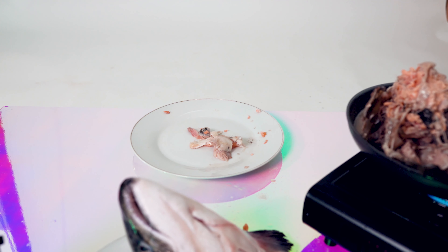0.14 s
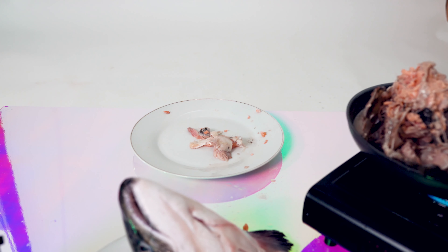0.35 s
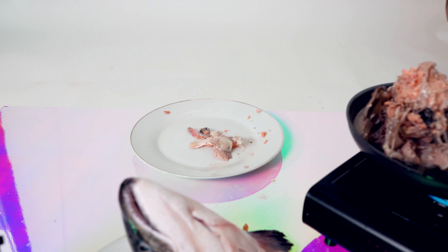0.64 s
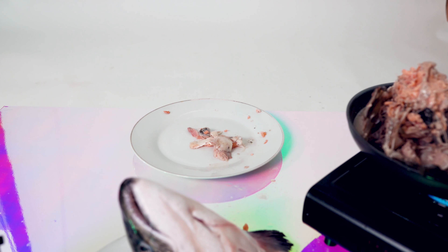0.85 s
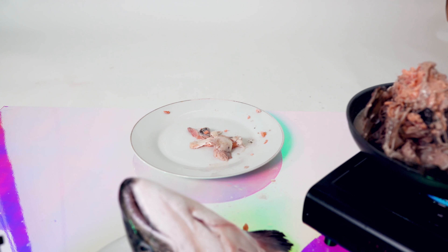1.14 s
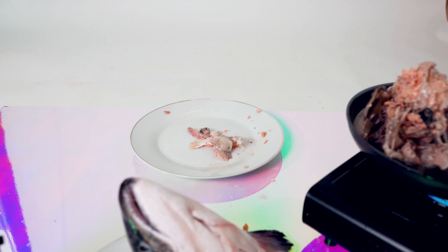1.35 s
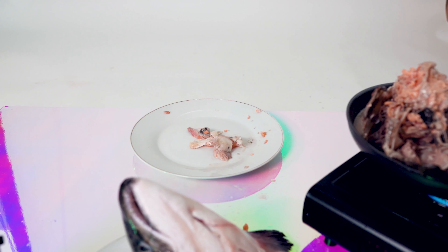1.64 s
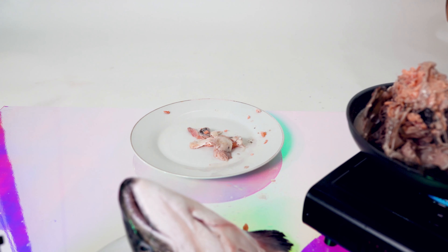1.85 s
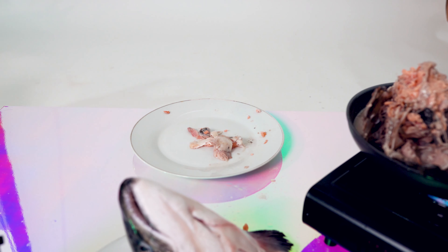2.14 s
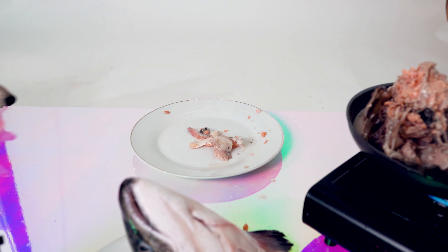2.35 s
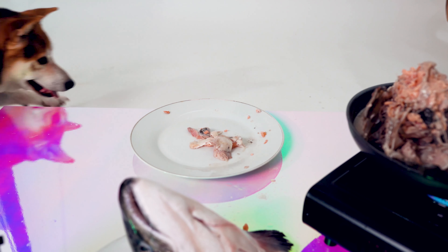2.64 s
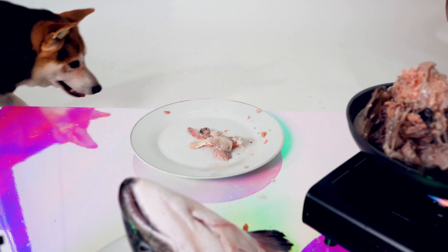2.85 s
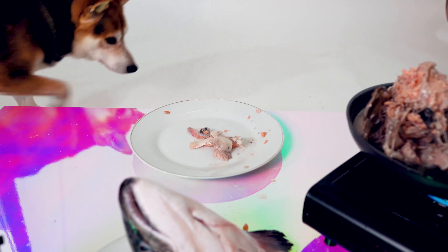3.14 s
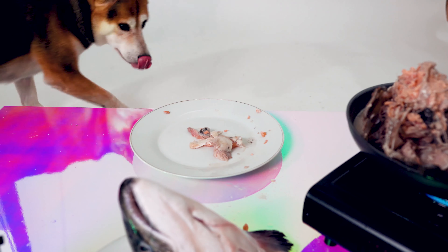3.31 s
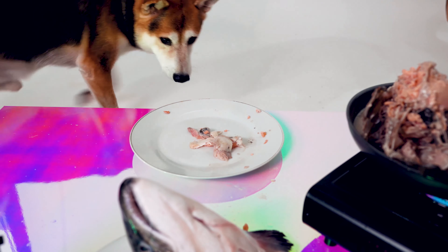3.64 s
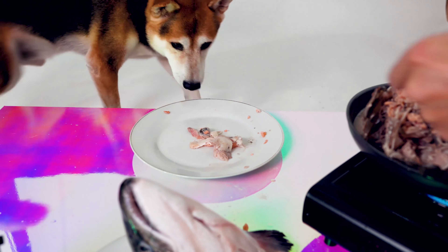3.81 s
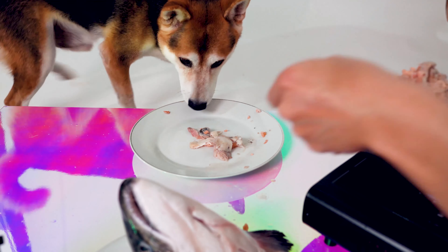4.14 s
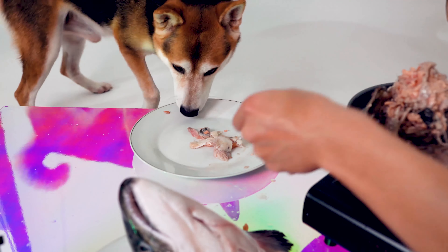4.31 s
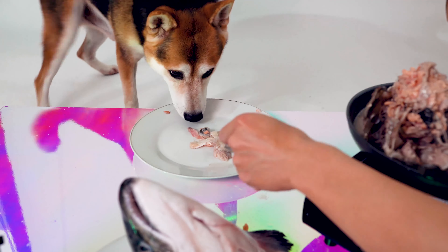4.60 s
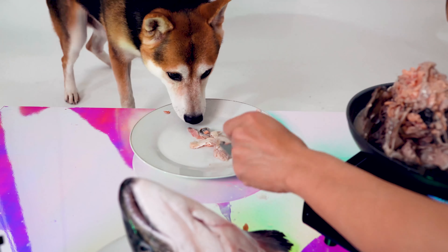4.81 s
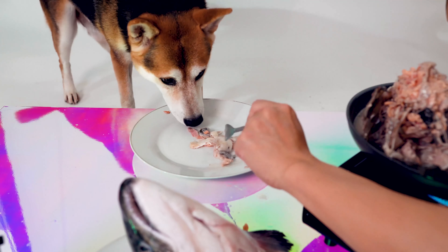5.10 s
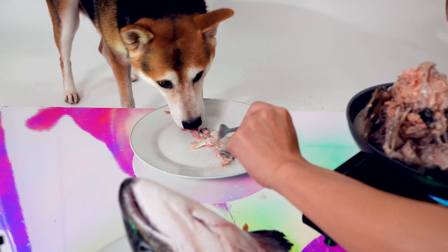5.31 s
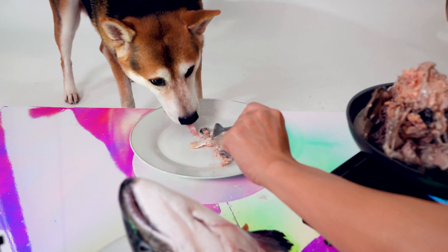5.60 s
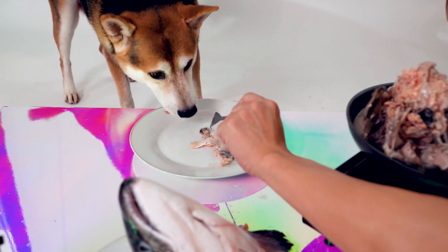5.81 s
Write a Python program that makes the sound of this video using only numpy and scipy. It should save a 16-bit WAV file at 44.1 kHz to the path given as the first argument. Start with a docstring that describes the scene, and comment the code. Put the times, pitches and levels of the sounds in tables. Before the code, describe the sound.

Metal tongs click over a humming fan, then a dog pads up and sniffs while wet food softly squelches on a plate.

```python
"""Fish scraps for the dog

A small bare room with a hard floor and a short echo, heard from one microphone on the table.
A fan hums throughout. Close by, metal tongs click at a bowl of fish and the table is bumped.
A dog pads up over the floor, claws ticking; fur and a sleeve rustle, and the dog sniffs
at a plate while wet scraps squelch on it."""
import sys
import numpy as np
from scipy import signal
from scipy.fft import rfft, irfft, next_fast_len
from scipy.io import wavfile
from scipy.ndimage import uniform_filter1d

SR = 44100
rng = np.random.default_rng(int(sys.argv[2]) if len(sys.argv) > 2 else 0)


def dump(signal):
    """Clip the signal to [-1, 1] and save it as 16-bit WAV at the path in sys.argv[1]."""
    limited = np.clip(np.atleast_2d(signal).T, -1, 1)
    pcm = np.round(limited * 32767).astype(np.int16)
    wavfile.write(sys.argv[1], SR, pcm)


N = 262836
T = np.arange(N) / SR
HIT_T = T[:SR // 3]  # time within one short sound


def undb(db):
    """Decibels to gain."""
    return 10 ** (np.asarray(db) / 20)


def unit(x):
    """Scale to rms 1."""
    return x / np.sqrt(np.mean(x ** 2))


def along(points, hz):
    """Read (f/Hz, value) points on a log-frequency axis."""
    f, value = np.transpose(points)
    return np.interp(np.log(hz + 1), np.log(f), value)


def colour(x, points, peaks=()):
    """Causal filter of unit power gain from a spectrum and (f/Hz, width/Hz, gain/dB) resonances."""
    size = 2 * next_fast_len(len(x))
    hz = np.arange(size // 2 + 1) * SR / size
    peaks_db = sum(db / (1 + (2 * (hz - f) / width) ** 2) for f, width, db in peaks)
    gain = unit(undb(along(points, hz) + peaks_db))
    cepstrum = irfft(np.log(gain))
    cepstrum[1:size // 2] *= 2  # fold to minimum phase
    cepstrum[size // 2 + 1:] = 0
    return irfft(rfft(x, size) * np.exp(rfft(cepstrum)))[:len(x)]


def wander(rate_hz):
    """Smooth random drift of rms 1."""
    hold = int(SR / rate_hz)
    stairs = np.repeat(rng.standard_normal(N // hold + 1), hold)
    return unit(uniform_filter1d(uniform_filter1d(stairs, hold), hold)[:N])


def add(track, s, sound):
    """Mix a sound into a track at time s."""
    start = int(s * SR)
    track[start:start + len(sound)] += sound[:N - start]


# The fan's air as it reaches the table: f/Hz, relative level/dB
AIR_SPECTRUM = [(20, -2.5), (50, -10), (70, 4), (100, 2.5), (160, -2.5), (280, -6), (550, -9),
                (1100, -16.5), (1500, -18.5), (2600, -23), (3700, -28), (6800, -33.5), (11000, -33.5),
                (15500, -41.5)]
# Whistling bands of the fan housing: f/Hz, width/Hz, gain/dB
HOUSING_BANDS = [(1123, 62, 6.5), (3170, 206, 9.5), (3770, 390, 7.5), (5327, 153, 13), (5770, 380, 11.5),
                 (8520, 1500, 5.5), (9660, 350, 3.5), (10960, 450, 6), (12000, 420, 10.5), (14800, 500, 11)]
# Slow shift of the air's treble: t/s, gain/dB
AIR_TREBLE = [(0, 0.5), (3, 1), (5.2, 0.4), (5.96, -2)]
# Motor tones: f/Hz, rms level/dB
MOTOR_TONES = [(118.4, -42.5), (177.6, -52), (376.8, -55), (570.6, -57), (629.8, -63)]
def fan(air_db=-38.5, waver_db=2, waver_hz=2.81):
    """The room tone: steady air through a resonant housing, over a wavering motor hum."""
    air = colour(rng.standard_normal(N), AIR_SPECTRUM, HOUSING_BANDS) * undb(air_db + 0.23 * wander(4))
    treble = signal.sosfiltfilt(signal.butter(2, 5000, "high", fs=SR, output="sos"), air)
    treble_gain = undb(np.interp(T, *np.transpose(AIR_TREBLE)))
    hum = 0
    for hz, db in MOTOR_TONES:
        amplitude = np.sqrt(2) * undb(db + waver_db * wander(9))
        phase = 2 * np.pi * np.cumsum(hz + waver_hz * wander(14)) / SR
        hum += amplitude * np.sin(phase)
    return air + (treble_gain - 1) * treble + hum


def contact(decay, snap):
    """One sharp impact with a share `snap` of the energy, then micro-impacts that die away."""
    burst = np.sqrt(1 - snap) * rng.choice([-1., 1.], len(HIT_T)) * np.exp(-HIT_T / decay)
    burst[0] = np.sqrt(snap * decay * SR / 2)
    return burst


def ringing(modes, scatter_db, max_t60):
    """Free decay of modes; every blow excites them a little differently."""
    out = 0
    for hz, db, t60 in modes:
        gain = undb(db + scatter_db * rng.standard_normal())
        tone = np.sin(2 * np.pi * hz * HIT_T + rng.uniform(0, 2 * np.pi))
        out += gain * tone * np.exp(-np.log(1000) * HIT_T / min(t60, max_t60))
    return out


# The crack of steel on steel: f/Hz, relative level/dB
CRACK_SPECTRUM = [(300, -28), (1650, -21.5), (2100, -8), (3500, -8.5), (5000, -15), (7000, -2.5),
                  (10000, -1), (12500, -1.5), (15500, -11.5)]
# Quickly damped resonances of the arms: f/Hz, width/Hz, gain/dB
ARM_BANDS = [(2290, 230, 3.5), (3200, 220, 5), (4270, 180, 15.5), (5560, 250, 15.5), (6900, 370, 4),
             (8000, 85, 9), (9600, 1000, 5.5), (11520, 480, 7), (13200, 500, 7), (15120, 600, 16.5)]
# Ringing modes of the steel: f/Hz, relative level/dB, t60/s before the cap
STEEL_MODES = [(4050, -10, 0.08), (4980, 0, 0.093), (5350, 0.5, 0.043), (6550, -3, 0.14), (8250, 3.5, 0.13),
               (9157, -23, 0.52), (9717, 3.5, 0.097), (9800, -14, 0.13), (10940, -26, 0.092),
               (11130, -5, 0.14), (12800, -6, 0.094), (13470, -17, 0.19)]
# Clicks at the bowl: t/s, level/dB, ping f/Hz, ping/dB, low clack/dB, first rebound's loss/dB
TONG_CLICKS = [(0.2428, -5.5, 9860, 0, -5.5, 2), (0.3135, -22.5, 15000, -9, 5, 6),
               (0.7718, -17, 7500, -2, 10.5, 8), (1.3444, -25.5, 9570, -3.5, 11, 14),
               (2.2218, -27.5, 11100, -17, -8, 17), (2.4655, -22.5, 8700, -14, 12, 17)]
def tongs(rebound_s=0.0103, contact_s=0.0015, softening=1.63, arm_split=0.025, ring_db=-28):
    """Near the microphone the arms crack shut and rebound, ping slightly apart and ring on faintly."""
    out = np.zeros(N)
    for s, db, hz, ping_db, clack_db, loss_db in TONG_CLICKS:
        phase = 2 * np.pi * hz * HIT_T
        arms = np.sin((1 + arm_split) * phase) - np.sin((1 - arm_split) * phase)
        bands = ARM_BANDS + [(14000, 3100, -1), (2780, 770, clack_db)]
        for k in range(4):  # the strike, then three ever weaker, softer rebounds
            decay = contact_s * softening ** k
            crack = colour(contact(decay, snap=0.046), CRACK_SPECTRUM, bands)
            ping = undb(-11 if k else ping_db) * arms * np.exp(-HIT_T / decay)
            ring = undb(ring_db) * ringing(STEEL_MODES, scatter_db=2, max_t60=0.15)
            add(out, s + k * rebound_s, undb(db - loss_db * k ** 2) * (crack + ping + ring))
    return room(out, wet_db=-7.5)


# Echo of the bare room: f/Hz, t60/s
ROOM_DECAY = [(100, 0.23), (500, 0.49), (2000, 0.41), (6000, 0.45), (10000, 0.19), (16000, 0.5)]
def room(x, wet_db, gap_s=0.0063):
    """Direct sound at the microphone, then a diffuse echo whose bands die at their own pace."""
    t = T[:int(0.6 * SR)]
    edges = np.geomspace(60, 17000, 10)
    tail = 0
    for lo, hi in zip(edges, edges[1:]):
        bandpass = signal.butter(3, [lo, hi], "band", fs=SR, output="sos")
        band = signal.sosfilt(bandpass, rng.standard_normal(len(t)))
        tail += band * np.exp(-np.log(1000) * t / along(ROOM_DECAY, np.sqrt(lo * hi)))
    tail *= (t > gap_s) * (1 + 0.8 * np.exp(-t / 0.016))  # the table and near wall answer first
    return x + undb(wet_db) * signal.fftconvolve(x, tail / np.sqrt(np.sum(tail ** 2)))[:N]


# Dull bumps against the table: t/s, peak level/dB, f/Hz
TABLE_BUMPS = [(.365, -34.5, 62.6), (0.818, -30, 152), (1.349, -22, 78), (4.103, -29, 70.6),
               (4.122, -32, 115), (4.205, -30, 71.6)]
def table_thuds(rise_cycles=1.2, step_db=-17, step_hz=60):
    """Right under the microphone, the table top swings for a few cycles after a bump or a paw step."""
    out = np.zeros(N)
    shakes = [(s, db + step_db, step_hz) for s, db, *_ in PAW_STEPS]
    for s, db, hz in TABLE_BUMPS + shakes:
        rise = rise_cycles / hz
        swing = HIT_T / rise * np.exp(1 - HIT_T / rise)
        add(out, s, undb(db) * swing * np.sin(2 * np.pi * hz * HIT_T))
    return out


# Hard surfaces and grit in contact: f/Hz, relative level/dB
GRIT_SPECTRUM = [(400, -15), (2000, 5), (4000, 2), (6000, -1), (9000, -0.5), (12000, -5), (15500, -11)]
def tick(hz, resonance_db, decay):
    """A hard little contact with one broad resonance."""
    return colour(contact(decay, snap=0.08), GRIT_SPECTRUM, [(hz, 0.34 * hz, resonance_db)])


# Ticks around the table: t/s, level/dB, f/Hz, resonance/dB, decay/s, number of contacts
HARD_TICKS = [(1.3468, -35.5, 1900, 13, 0.0098, 1), (2.8222, -18, 4400, 13, .0026, 3),
              (2.8284, -26, 8500, 10, .003, 1), (3.3233, -28.5, 7360, 14, 0.0033, 1),
              (3.471, -31.5, 2270, 20, 0.0025, 1), (3.515, -38, 2400, 10, .005, 1),
              (4.0077, -18.5, 3420, 12.5, 0.0018, 3), (4.080, -33, 3200, 13, .006, 1),
              (5.165, -35, 9000, 11, .0023, 1), (5.3987, -39, 8400, 14, .0035, 1),
              (5.498, -37, 12800, 21, .0023, 1), (5.7915, -30.5, 3500, 9, 0.0024, 1)]
def ticks(gap_s=0.016, loss_db=6):
    """Claws, bones and crockery tap once or in a short fading rattle."""
    out = np.zeros(N)
    for s, db, hz, resonance_db, decay, count in HARD_TICKS:
        for k in range(round(count)):
            add(out, s + k * gap_s, undb(db - k * loss_db) * tick(hz, resonance_db, decay))
    return room(out, wet_db=-7)


def scuff(rise, fall, spread_db, grain_samples):
    """Friction noise in tiny uneven grains, under a force that builds evenly and dies away."""
    n = len(HIT_T)
    force = np.minimum(HIT_T / rise, 1) * np.exp(-np.maximum(HIT_T - rise, 0) / fall)
    sizes = undb(spread_db * rng.standard_normal(n // grain_samples + 1))
    return force * unit(np.repeat(sizes, grain_samples)[:n] * rng.standard_normal(n))


# The slap of a pad: f/Hz, relative level/dB
PAD_SPECTRUM = [(40, -11), (110, -5), (200, 0), (290, 0.5), (600, -5), (1100, -10), (2000, -17.5),
                (3800, -17), (6000, -38.5), (15000, -29)]
# Modes of the floor covering: f/Hz, relative level/dB, t60/s before the cap
FLOOR_RING = [(231.5, -2, 0.44), (351, -4.5, 0.17), (487, -10, 0.43), (738, -6, 0.22), (870, -35, 0.11),
              (1005, -8, 0.096), (1045, -15, 0.22), (1450, -17, 0.18)]
# Steps, heard from the table: t/s, level/dB, rise/s, fall/s, hollow f/Hz, hollow/dB,
# then, relative to the pad, grit/dB, floor boom/dB, claw/dB
PAW_STEPS = [(2.8167, -16.5, .003, 0.022, 940, 8, -12, -4, -16),
             (3.469, -33, 0.0022, 0.029, 2130, 9, -16, -15, -18),
             (3.663, -28.5, 0.014, 0.044, 420, -2, -5.5, -15.5, -2.5),
             (3.967, -23, 0.0034, 0.02, 1270, 3.5, -25, -15, -8.5),
             (4.335, -31, .012, 0.024, 2940, 5.5, -13, -11, -16),
             (4.604, -32.5, 0.0045, .04, 1810, 8, -12, -17, -14),
             (4.810, -20, 0.017, 0.026, 1900, 15, -17, -28, -9.5)]
def paws(claw_lead_s=0.009):
    """Down on the floor the claws touch first; the pad slaps, booms hollow and drags grit as it slides."""
    out = np.zeros(N)
    for s, db, rise, fall, hz, hollow_db, grit_db, boom_db, claw_db in PAW_STEPS:
        slap = scuff(rise, fall, spread_db=2, grain_samples=40)
        pad = colour(slap, PAD_SPECTRUM, [(hz, 0.5 * hz, hollow_db)])
        slide = scuff(rise=0.017, fall=0.051, spread_db=3, grain_samples=12)
        grit = colour(slide, GRIT_SPECTRUM, [(4180, 1400, 3.5)])
        boom = np.minimum(HIT_T / rise, 1) * ringing(FLOOR_RING, scatter_db=1.5, max_t60=0.3)
        claw_hz = 11400 * 2 ** (-0.2 * db)  # far above hearing, so the scratch has no pitch
        add(out, s - claw_lead_s, undb(db + claw_db) * tick(claw_hz, resonance_db=15, decay=0.0095))
        add(out, s, undb(db) * (pad + undb(grit_db) * grit + undb(boom_db) * boom))
    return room(out, wet_db=-9.5)


def swell(s, rise, fall):
    """A smooth rise to 1 at time s and a smooth fall."""
    return np.exp(-0.5 * ((T - s) / np.where(T < s, rise, fall)) ** 2)


# Soft hiss of fur, cloth and breath: f/Hz, relative level/dB
HISS_SPECTRUM = [(300, 3), (1200, 1), (3500, 8), (6000, 2.5), (8800, 3.5), (12000, 0), (15500, -6)]
# The dog and a hand reach the plate: peak t/s, level/dB, rise/s, fall/s
REACHES = [(4.04, -44, .025, 0.11), (4.58, -46, 0.18, 0.28)]
def rustle():
    """Close and dry, fur and a sleeve rub unevenly, swelling with each movement."""
    motion = sum(undb(db) * swell(s, rise, fall) for s, db, rise, fall in REACHES)
    return colour(motion * undb(1.8 * wander(90)) * rng.standard_normal(N), HISS_SPECTRUM)


# Wet fish on the plate, close by: t/s, level/dB, cavity f/Hz, decay/s, crackle/dB, number of pops
FISH_POPS = [(4.289, -29, 596, 0.0016, -3, 1), (4.7235, -27.5, 1210, 0.0054, -1.5, 2),
             (4.9337, -30.5, 1400, 0.0014, 0, 1), (5.2563, -28, 1210, 0.0024, -9, 1),
             (5.5429, -21.5, 1130, 0.0026, -11, 1), (5.777, -33, 950, 0.0072, 4, 3)]
def squelches(glide=0.19, gap_s=0.0125, loss_db=3, scatter_oct=0.117, low_ratio=0.66, low_db=-8):
    """A wet film parts with a crackle; the small cavity behind it rings, rising in pitch as it opens."""
    out = np.zeros(N)
    for s, db, first_hz, decay, crackle_db, count in FISH_POPS:
        hz = first_hz
        fade = np.exp(-HIT_T / decay)
        for k in range(round(count)):
            phase = 2 * np.pi * np.cumsum(hz * (1 + glide * (0.5 - fade))) / SR
            ring = np.sin(phase) * fade
            low_ring = undb(low_db) * np.sin(low_ratio * phase) * np.exp(-HIT_T / (2 * decay))
            cavity = [(0.24 * hz, -28), (0.57 * hz, -4), (1.3 * hz, 0),
                      (1.52 * hz, -14), (4 * hz, -17), (10 * hz, -32)]
            crackle = undb(crackle_db) * colour(contact(decay, snap=0.12), cavity)
            add(out, s + k * gap_s, undb(db - k * loss_db) * (ring + low_ring + crackle))
            hz = first_hz * 2 ** (scatter_oct * rng.standard_normal())
    return room(out, wet_db=-15)


# The dog's nose at the plate: peak t/s, level/dB, rise/s, fall/s, treble/dB
DOG_SNIFFS = [(4.512, -39.5, 0.071, 0.046, 8), (4.722, -37, 0.039, 0.051, 2),
              (4.825, -37.5, 0.024, 0.041, -15), (5.16, -45.5, 0.028, 0.014, 12)]
def sniffs():
    """Air hisses through the nostrils in short swells that flutter a little."""
    out = np.zeros(N)
    flutter = undb(0.8 * wander(120))
    for s, db, rise, fall, treble_db in DOG_SNIFFS:
        breath = undb(db) * swell(s, rise, fall) * flutter * rng.standard_normal(N)
        out += colour(breath, HISS_SPECTRUM, [(10000, 11000, treble_db)])
    return room(out, wet_db=-6)


def scene():
    """Everything reaches the one microphone on the table, the same in both channels."""
    mono = fan() + tongs() + table_thuds() + ticks() + paws() + rustle() + squelches() + sniffs()
    return np.array([mono, mono])


def record(dry):
    """The recorder cuts the treble above 15.9 kHz."""
    return signal.sosfilt(signal.ellip(10, 0.2, 80, 15900, fs=SR, output="sos"), dry)


dry = scene()
out = record(dry)
dump(out)
```